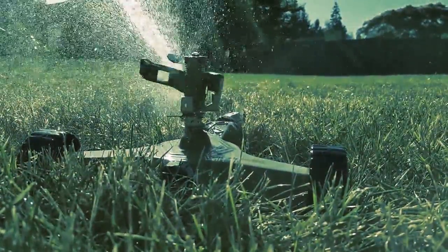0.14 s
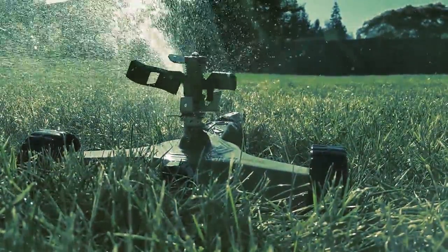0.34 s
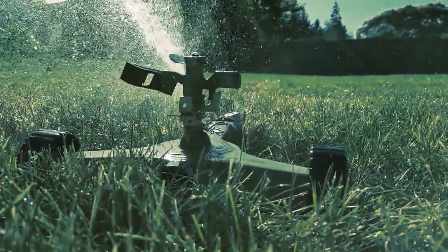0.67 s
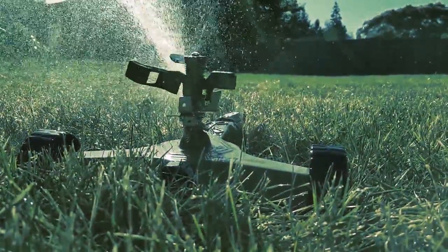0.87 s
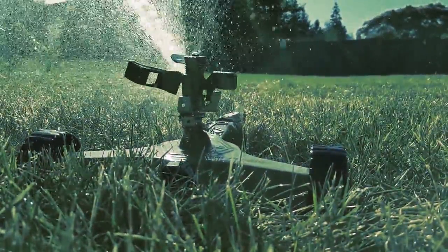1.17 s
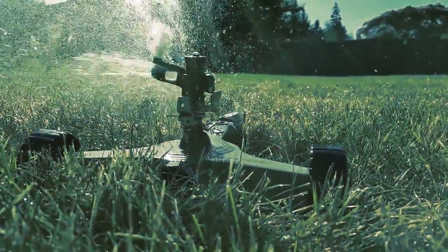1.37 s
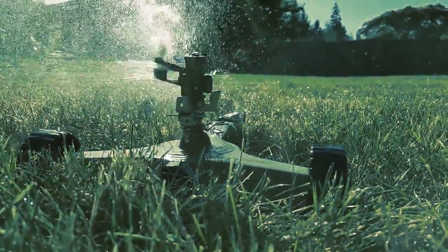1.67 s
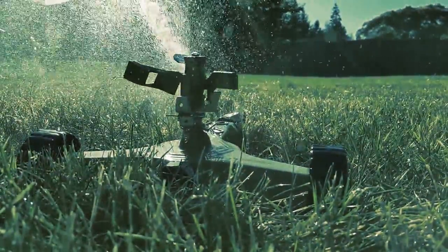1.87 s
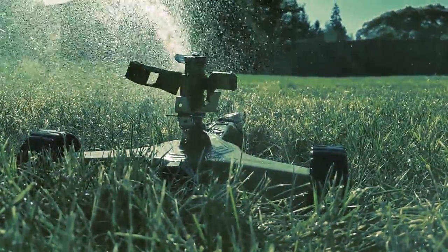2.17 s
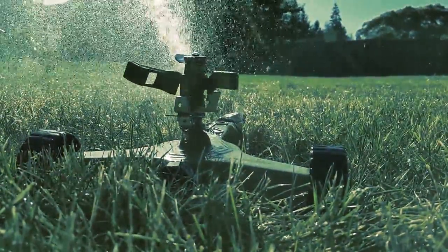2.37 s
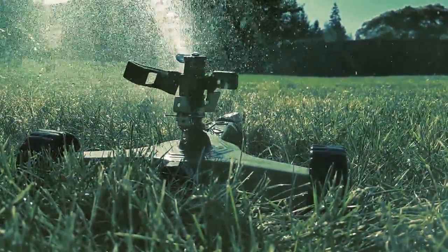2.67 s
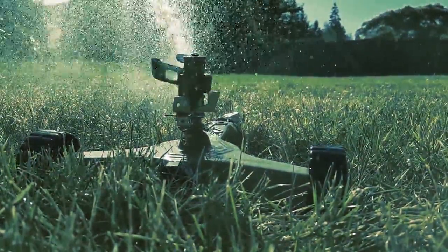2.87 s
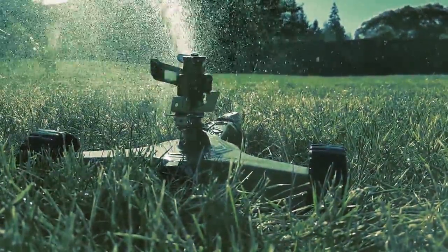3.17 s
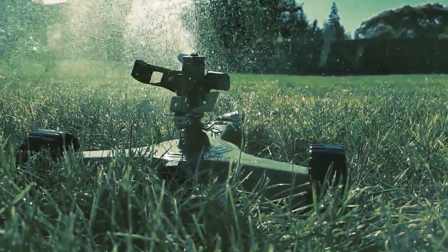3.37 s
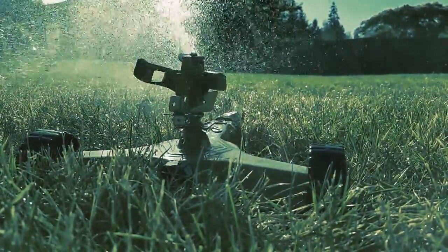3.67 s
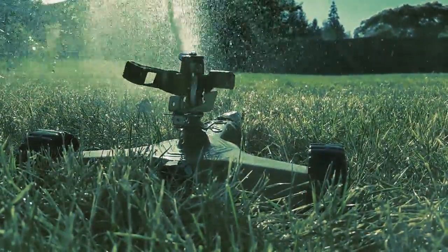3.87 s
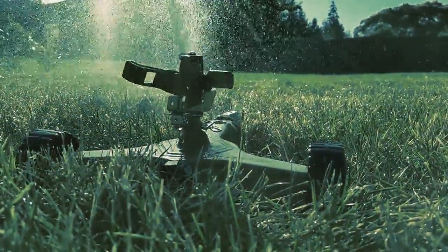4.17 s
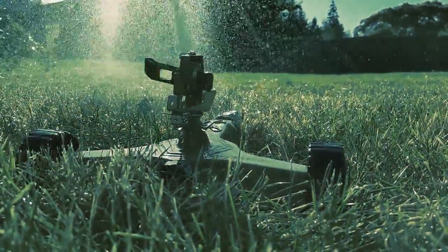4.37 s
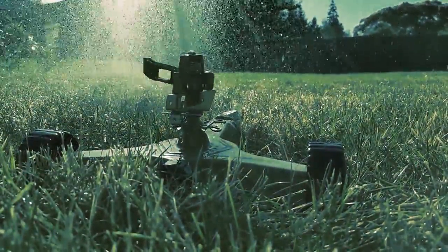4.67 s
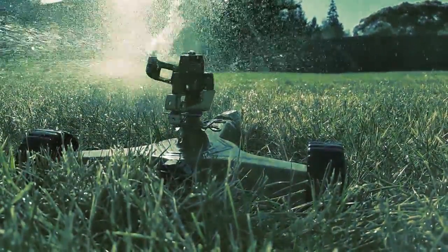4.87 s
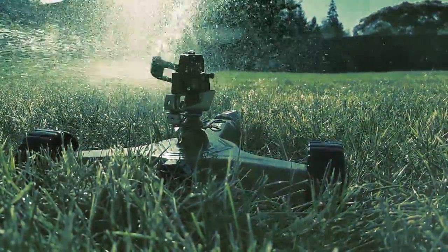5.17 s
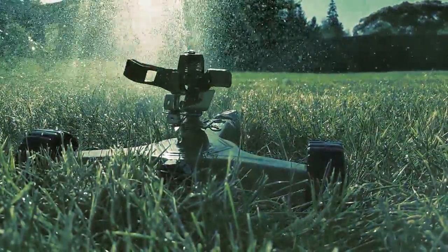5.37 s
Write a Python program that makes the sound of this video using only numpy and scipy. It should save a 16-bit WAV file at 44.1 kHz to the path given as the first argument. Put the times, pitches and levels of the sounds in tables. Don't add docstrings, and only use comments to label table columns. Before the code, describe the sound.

An impact sprinkler runs throughout, very close to a small stereo microphone on open grass with no room echo. From 0.1 s it beats about every 0.15 s, steady but slightly uneven in strength. Each beat starts with a snappy slap of a few milliseconds, swells into a bright fizz and spatter of shredded water lasting about 0.05 s, and carries a faint, dull metallic-plastic knock. Between beats a thin, flickering hiss continues, with fine patter and single larger drops popping left and right, for example near 0.25, 0.7, 0.95 and 4.4 s. Far behind lies low traffic hum; a soft distant thump comes at 0.2 s. Slaps are hardest until about 1.6 s, then generally softer after 2.3 s, with occasional sharp ones, as at 3.0 and 4.65 s. From about 4.3 s a low engine drone draws nearer, still quiet. Highs end abruptly, and noise reduction leaves slightly watery, patchy gaps until 5.5 s.

```python
import sys
import numpy as np
from scipy import signal
from scipy.fft import rfft, irfft, next_fast_len
from scipy.io import wavfile
from scipy.ndimage import uniform_filter1d

SR = 44100
rng = np.random.default_rng(int(sys.argv[2]) if len(sys.argv) > 2 else 0)


def bounce(signal):
    frames = np.transpose(np.atleast_2d(signal))
    limited = np.clip(frames, -1, 1)
    pcm = np.round(limited * 32767).astype(np.int16)
    wavfile.write(sys.argv[1], SR, pcm)


def magnitude_from_level(level_db):
    exponent = np.asarray(level_db, float) / 20
    return 10 ** exponent


N = 243873


def evened(x):
    return x / np.sqrt(np.mean(x ** 2) + 1e-20)


def smooth_noise(size):
    once = uniform_filter1d(rng.standard_normal(N), size=size)
    return evened(uniform_filter1d(once, size=size))


def add(mix, s, sound):
    part = mix[..., round(s * SR):][..., :sound.shape[-1]]
    part += sound[..., :part.shape[-1]]


def curve(rows):
    s, db = np.transpose(rows)
    return magnitude_from_level(np.interp(np.arange(N) / SR, s, db)) * np.ones((2, 1))


def lean(db):
    return magnitude_from_level(np.array([[db / 2], [-db / 2]]))


def droplets(per_s, spread_db, mist):
    lands = rng.random(N) < per_s / SR
    size = magnitude_from_level(spread_db * np.minimum(rng.exponential(1, N), 5)) * lands
    clicks = evened(size) * rng.choice([-1., 1.], (2, N))
    return np.sqrt(1 - mist) * clicks + np.sqrt(mist) * rng.standard_normal((2, N))


# pitch in Hz, left minus right in dB for the spoon,
# the same in dB for the wide spray, likeness of the ports [0-1].
PORTS = [(60, -1, -1, .8), (400, 0, .5, .8), (1400, 3, 2, .5), (2050, 12, 8, .3), (2800, -3, 3, .2),
         (4100, 5, 4, .75), (5000, .5, .5, .65), (6900, -2, 1, .8), (8200, 15, 11, .9), (9000, 15, 15, .8),
         (9700, 6, 4, .95), (10400, 0, -4, .98), (11700, -1, -2, .8), (12400, 4, 5, .45),
         (13300, 3, -2, .8), (14500, 1, -1, .6)]
# pitch in Hz, lead in radians.
LEAD = [(0, 0), (1400, 2.3), (2800, 2.5), (4800, 3.7), (6900, 6.6), (8300, 8.5), (9000, 10.4),
        (11000, 16.3), (14500, 21.9)]
EDGE_HZ = 14550


def heard(streams, envelope, spectrum, alike=1.0, wide=False):
    size = next_fast_len(N + SR // 10)
    hz = np.fft.rfftfreq(size, 1 / SR)
    f, db = np.transpose(spectrum)
    log_gain = np.interp(np.log(hz + 1), np.log(f + 1), db) * np.log(10) / 20
    mirrored = np.r_[log_gain, log_gain[-2 + size % 2:0:-1]]
    colour = np.exp(np.conj(signal.hilbert(mirrored))[:len(hz)])

    f, *columns = np.transpose(PORTS)
    spoon_db, spray_db, same = (np.interp(hz, f, c) for c in columns)
    balance_db = spray_db if wide else spoon_db
    lead = np.interp(hz, *np.transpose(LEAD))
    same = np.clip(same * alike, 0, 1)
    pair = np.array([colour, colour * magnitude_from_level(-balance_db) * np.exp(-1j * lead)])
    pair /= np.sqrt(np.mean(abs(pair) ** 2 * (hz < EDGE_HZ)))

    left, shared, other = rfft([*(streams[0] * envelope), streams[1] * envelope[1]], size)
    right = same * shared + np.sqrt(1 - same ** 2) * other
    return irfft(pair * [left, right], size)[:, :N]


# pitch in Hz, density in dB per Hz.
HUM = [(40, -64.5), (70, -13), (110, 2.5), (170, 1), (500, -7), (1050, -9), (2000, -11.5), (4000, -48.5)]
# pitch in Hz, density in dB per Hz.
RUMBLE = [(15, -10), (30, -12.5), (60, -0.5), (78, -4.5), (100, -2.5), (200, -79)]
# time in seconds, level in dB.
DRONE = [
    (0, -68),
    (4.0, -60),
    (4.3, -52),
    (5.53, -51),
]


def distance():
    both = np.ones((2, 1))
    hum_gain = magnitude_from_level(-45.5 + 1.6 * smooth_noise(2500))
    hum = heard(rng.standard_normal((2, N)), both * hum_gain, HUM, wide=True)
    thud_db = 14 * np.exp(-((np.arange(N) / SR - 0.21) / 0.029) ** 2)
    rumble_gain = magnitude_from_level(-54.5 + thud_db + 2.0 * smooth_noise(4000))
    rumble = heard(rng.standard_normal((2, N)), both * rumble_gain, RUMBLE, alike=.75)

    drift, fade = smooth_noise(3000), smooth_noise(3000)
    turns = np.cumsum(1 + .004 * drift) / SR
    machinery = magnitude_from_level(-60 + 4.25 * fade) * np.sin(2 * np.pi * 471.7 * turns)
    drone = curve(DRONE) * magnitude_from_level(2.2 * fade[::-1]) * np.sin(2 * np.pi * 78.2 * turns)
    return hum + rumble + machinery + drone


# pitch in Hz, density in dB per Hz.
JET = [(400, -45.5), (1000, -27.5), (3000, -17), (4000, -16.5), (6000, -18), (7500, -14.5), (8600, -4),
       (10000, -8), (12000, -7.5), (13300, -8), (14400, -6.5)]
# time in seconds, level in dB.
JET_LEVEL = [(0.0, -33), (0.65, -34), (1.31, -33), (4.28, -32.5), (4.74, -34), (5.04, -33), (5.24, -32),
             (5.53, -33.5)]


def jet():
    envelope = curve(JET_LEVEL) * magnitude_from_level(1.3 * smooth_noise(150) + 2.5)
    return heard(droplets(2500, 3.3, .7), envelope, JET, alike=.75, wide=True)


# start in seconds, level in dB, lean to the left in dB.
DROPS = [(0.2531, -13, 5), (0.3471, -16, -6), (0.7086, -13, 16), (0.7876, -19.5, -2), (0.9634, -14.5, -4),
         (1.4587, -22.5, 0), (1.4695, -21, 17), (1.527, -27, -2), (2.3503, -17, 2.5), (2.6186, -18, -16),
         (2.6692, -25.5, 5.5), (2.967, -18, 1.5), (3.5737, -23.5, 0), (3.5815, -21, 7), (4.1046, -17, -1),
         (4.409, -14, -7), (5.0402, -19, 5), (5.3962, -16, -3), (5.501, -26, 6)]


def drops(count=24):
    envelope, t = np.zeros((2, N)), np.arange(200) / SR
    when, size, side = rng.random((count, 3)).T
    stray_db = -26 + 3.0 * (2 * size - 1)
    stray_lean_db = 13.5 * (2 * side - 1)
    strays = np.c_[when * N / SR, stray_db, stray_lean_db]
    for s, db, lean_db in [*DROPS, *strays]:
        add(envelope, s, magnitude_from_level(db - 3.0) * lean(lean_db) * np.exp(-t / 0.0015))
    return heard(rng.standard_normal((2, N)), envelope, JET, alike=.7, wide=True)


# beat number, time in seconds.
SWING = [(0, .1057), (15, 2.384), (22, 3.4396), (35, 5.4063)]
# time in seconds, slap level in dB.
SLAP_LEVEL = [
    (0, -15),
    (1.6, -14.5),
    (2.3, -20.5),
    (3.2, -20),
    (5.5, -25.5),
]
# start in seconds, slap level in dB, splash level in dB.
BEATS = [(0.2571, -13, -19), (0.4097, -17, -18.5), (0.5638, -19, -20.5), (0.713, -16.5, -18),
         (0.865, -16.5, -16.5), (1.0166, -14, -16), (1.3213, -15.5, -16.5), (1.7749, -17.5, -16.5),
         (2.0784, -21.5, -15), (2.533, -24, -17), (2.6854, -17, -16.5), (2.8362, -19.5, -16.5),
         (2.9865, -14.5, -16.5), (3.1418, -21.5, -18), (3.290, -18, -17.5), (3.4375, -22, -18),
         (3.5927, -17, -18), (3.7425, -16.5, -18), (4.044, -23, -15.5), (4.1971, -24, -19),
         (4.3469, -19, -17), (4.4986, -19.4, -18), (4.6519, -15.5, -21), (4.8016, -22, -17),
         (4.9522, -20, -17.5), (5.1047, -20, -18.5), (5.2546, -20, -16)]
SPLASH_DB = -17


def beats():
    number, at = np.transpose(SWING)
    s = np.interp(np.arange(number[-1] + 1), number, at)
    slap_db = np.interp(s, *np.transpose(SLAP_LEVEL))
    rows = np.c_[s, slap_db, np.full(len(s), SPLASH_DB)]
    odd = np.array(BEATS)
    nearest = abs(s - odd[:, :1]).argmin(1)
    rows[nearest] = odd
    harder_db = rows[:, 1] + 21.5
    return np.c_[rows, 0.97 + 0.0038 * harder_db, 1.26 - 0.17 * harder_db]


# pitch in Hz, level in dB, t60 in seconds.
ARM = [(921.3, -43, .1), (1503, -50.5, .08), (1673, -50, 0.042), (1923, -41.5, .1), (2296, -47, 0.088),
       (3133, -43, .09), (3950, -48.5, 0.12)]


def knocks():
    ring, t = np.zeros((2, N)), np.arange(4000) / SR
    hz, db, t60 = np.transpose(ARM)[..., None]
    rise = 1 - np.exp(-t / .004)
    for s, _, splash_db, _, _ in beats():
        share, tune, phase = rng.standard_normal((3, 2, len(ARM), 1))
        decay = magnitude_from_level(db + 3.0 * share[0] - 60 * t / t60)
        detuned_hz = hz * (1 + 0.0087 * tune[0])
        modes = decay * np.sin(2 * np.pi * (detuned_hz * t + phase))
        add(ring, s + .008, magnitude_from_level(splash_db - SPLASH_DB) * rise * modes.sum(1))
    return heard(ring, np.ones((2, 1)), [(100, 0), (15000, 0)])


def crossing(t, sag_db_per_s, cut_db_per_s):
    rise_db = -32 * np.maximum(1 - t / .010, 0) ** 2
    sag_db = sag_db_per_s * np.maximum(t - .021, 0)
    cut_db = cut_db_per_s * np.maximum(t - .034, 0)
    return magnitude_from_level(rise_db - sag_db - cut_db)


# pitch in Hz, density in dB per Hz.
FIZZ = [(5000, -32), (7300, -17), (8300, 1.5), (9500, 1.5), (11000, -4), (12000, -14.5), (14400, -25)]
# pitch in Hz, density in dB per Hz.
SPATTER = [(250, -45), (700, -24), (1800, -7.5), (3000, -15), (4000, -0.5), (7000, -3.5), (9000, -0.5),
           (12000, -0.5), (13000, -0.5), (14400, 1)]
# pitch in Hz, density in dB per Hz.
FLICK = [(8000, -18), (11000, 22.5), (12000, -33), (14400, -11.5)]


def splashes():
    fizz, spatter, flick = np.zeros((3, 2, N))
    for s, _, splash_db, length, lean_db in beats():
        t = np.arange(0, .060 * length, 1 / SR)
        strength = magnitude_from_level(splash_db) * lean(lean_db)
        add(fizz, s, strength * magnitude_from_level(-0.23) * crossing(t / length, 602, 2800))
        add(spatter, s, strength * magnitude_from_level(-5.5) * crossing(t / length, 379.5, 1103))
        add(flick, s, strength * magnitude_from_level(-7.0) * np.exp(-((t - .0095) / .0022) ** 2))
    sputter = magnitude_from_level(1.34 * smooth_noise(60))
    return (heard(droplets(8000, 3.0, .75), fizz * sputter, FIZZ, alike=.95)
            + heard(droplets(8000, 3.0, .8), spatter * sputter, SPATTER, alike=.9)
            + heard(droplets(8000, 3.0, .7), flick, FLICK, alike=.9))


# pitch in Hz, density in dB per Hz.
SLAP = [(300, -52), (1000, -45), (3000, -43), (4000, -22), (6000, -24), (7500, -10.5), (8700, -5),
        (10000, -14), (12000, -20), (14400, -12)]


def slaps():
    envelope, t = np.zeros((2, N)), np.arange(400) / SR
    shape = (1 - np.exp(-t / .0003)) * np.exp(-(t / .0025) ** 2)
    for s, slap_db, _, _, lean_db in beats():
        add(envelope, s, magnitude_from_level(slap_db + 3.0) * lean(lean_db) * shape)
    return heard(droplets(9000, 2.8, 0.53), envelope, SLAP, alike=0.93)


def scene():
    return distance() + jet() + drops() + knocks() + splashes() + slaps()


# pitch in Hz, threshold in dB over the usual
GATE = [(300, -12), (700, -1.5), (1850, 3.5), (2020, 9), (2250, 3.5), (2800, 11), (3130, 5), (3350, 6.5),
        (4700, 4.5), (7000, -2), (8000, -18), (14500, -10)]
# time in seconds, dB added to the threshold.
GATE_DRIFT = [(0, -4), (.75, 0), (4.3, .5), (4.9, 4), (5.53, -1)]
FULL_BAND = [.115, .42, .57, 1.18, 1.33, 2.39, 4.66]


def gated(x, follow=0.76, patchy_db=3.5):
    hz, t, z = signal.stft(x, SR, "cosine", nperseg=2048, noverlap=1024)
    level_db = 10 * np.log10(abs(z) ** 2 + 1e-20)
    usual_db = np.median(uniform_filter1d(level_db, size=9, axis=1), axis=2, keepdims=True)
    usual_db = .5 * usual_db + .5 * usual_db.max(0)
    moment_db = 10 * np.log10(np.mean(abs(z) ** 2, axis=1, keepdims=True) + 1e-20)
    patches = evened(uniform_filter1d(rng.standard_normal((129, len(t))), size=3, axis=1))

    limit_db = usual_db + np.interp(hz, *np.transpose(GATE))[:, None]
    limit_db = limit_db + np.interp(t, *np.transpose(GATE_DRIFT))
    limit_db += follow * (moment_db - np.median(moment_db))
    limit_db += patchy_db * np.repeat(patches, 8, axis=0)[:len(hz)]
    wide_open = abs(t[:, None] - FULL_BAND).min(1) < .014
    kept = z * ((level_db > limit_db) | wide_open)
    return signal.istft(kept, SR, "cosine", nperseg=2048, noverlap=1024)[1][:, :N]


def roll_off(x):
    return signal.sosfilt(signal.butter(12, 15750, fs=SR, output="sos"), x)


def record(dry):
    overloaded = 1.3 * np.tanh(dry / 1.3)
    edge = signal.firwin(201, EDGE_HZ, window=("kaiser", 6), fs=SR)
    limited = signal.oaconvolve(overloaded, edge[None], "same")
    upper_middle = signal.butter(2, [5000, 7600], "band", fs=SR, output="sos")
    band = signal.sosfiltfilt(upper_middle, limited)
    fluttering = limited + .4 * np.roll(band, 256, axis=1)
    return roll_off(gated(fluttering))


dry = scene()
out = record(dry)
bounce(out)
```